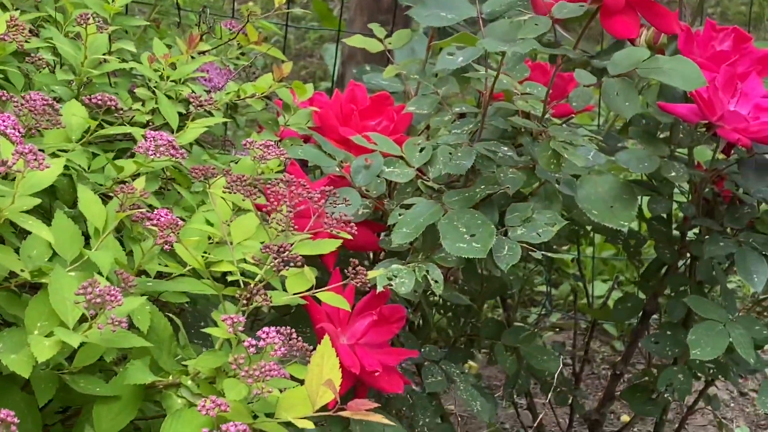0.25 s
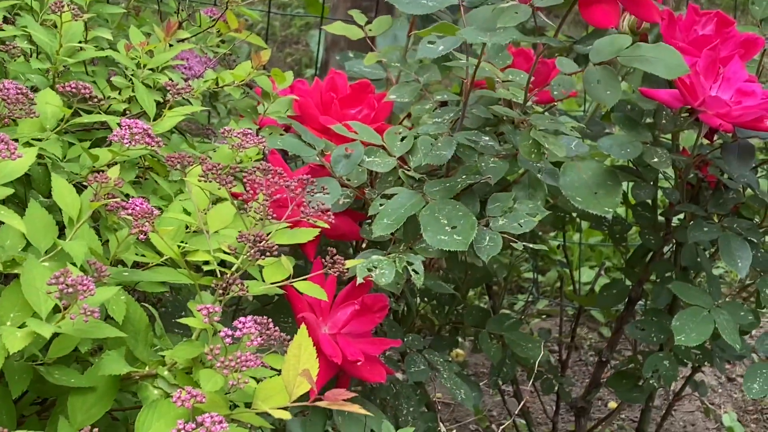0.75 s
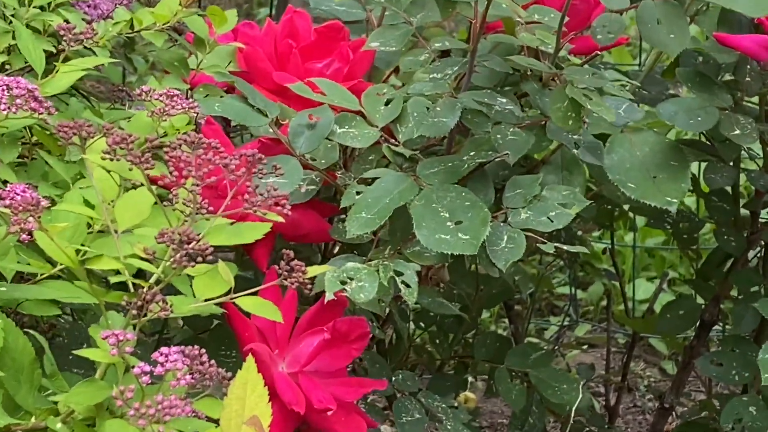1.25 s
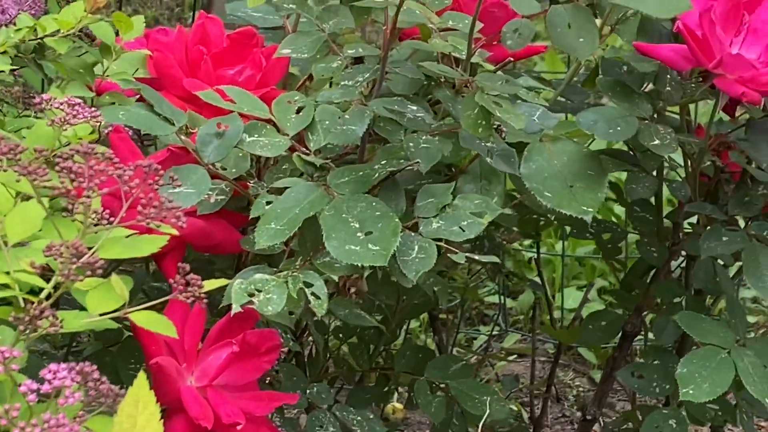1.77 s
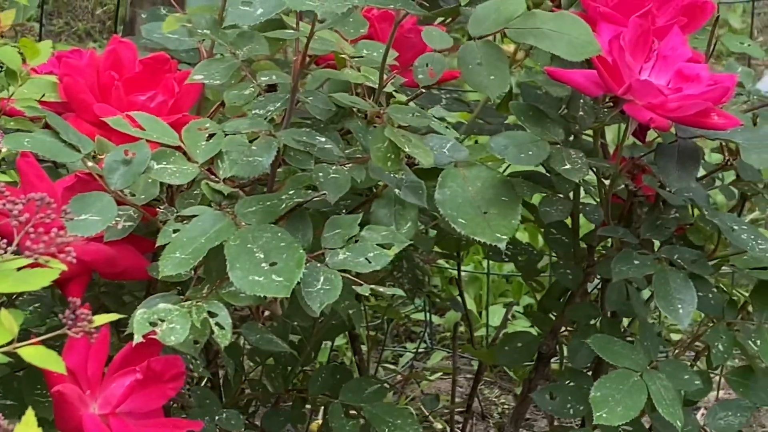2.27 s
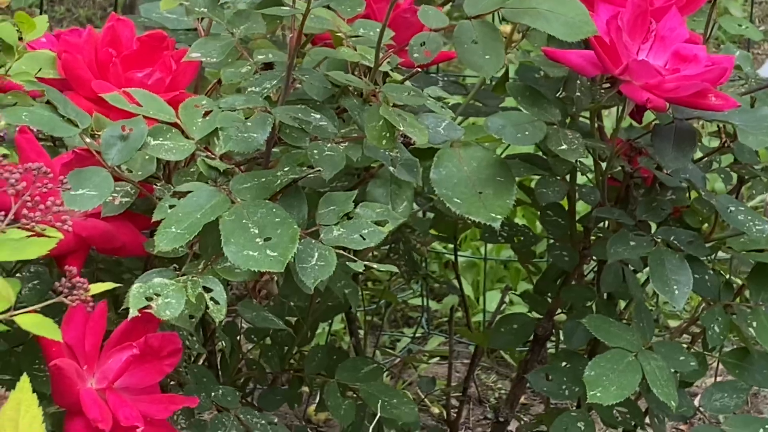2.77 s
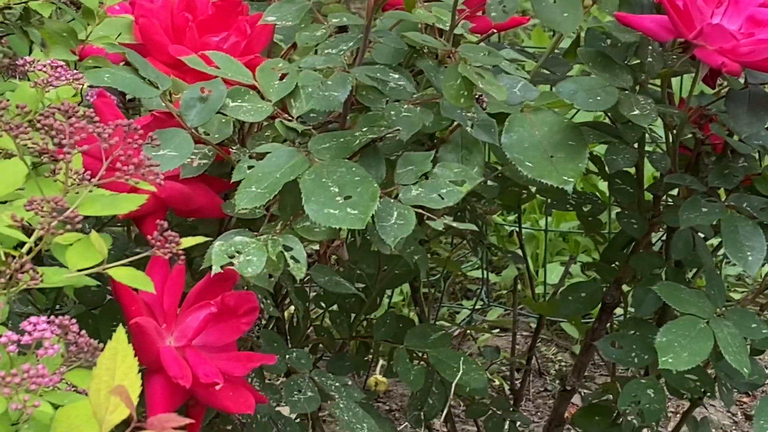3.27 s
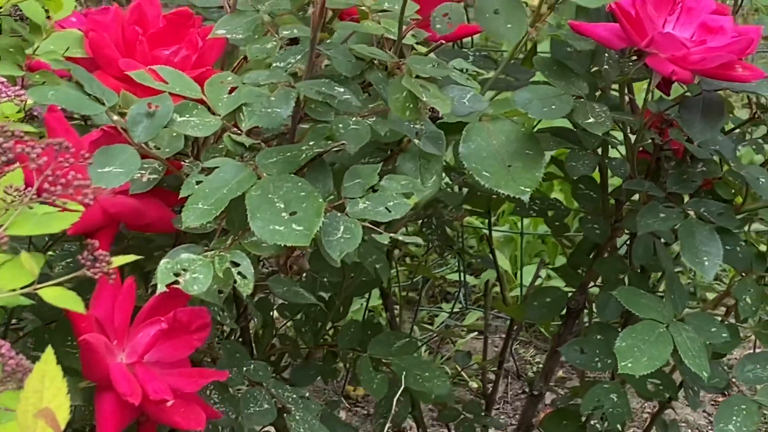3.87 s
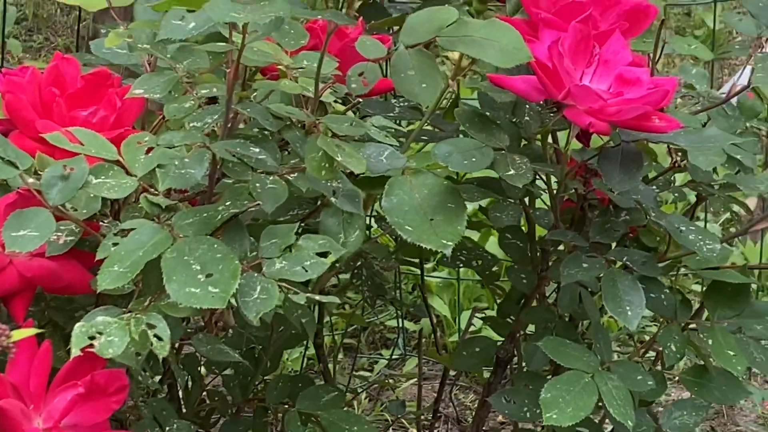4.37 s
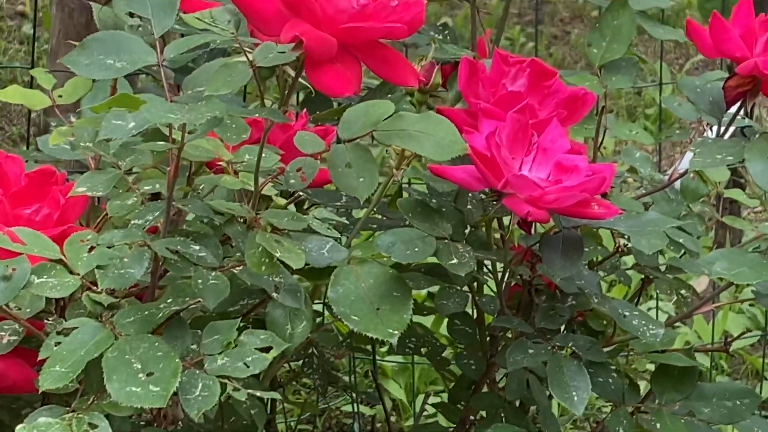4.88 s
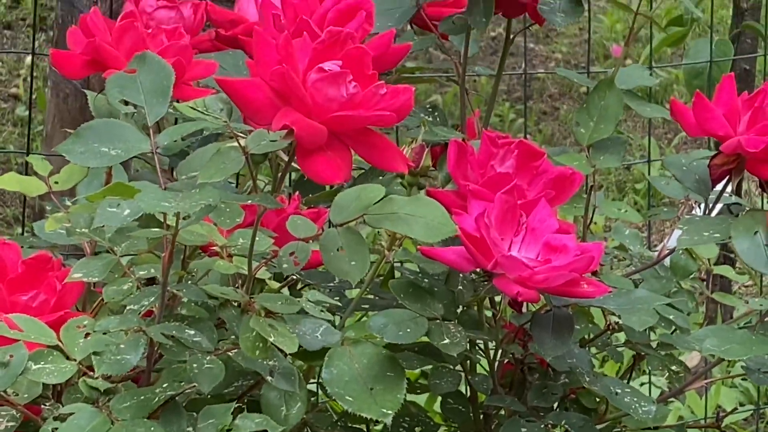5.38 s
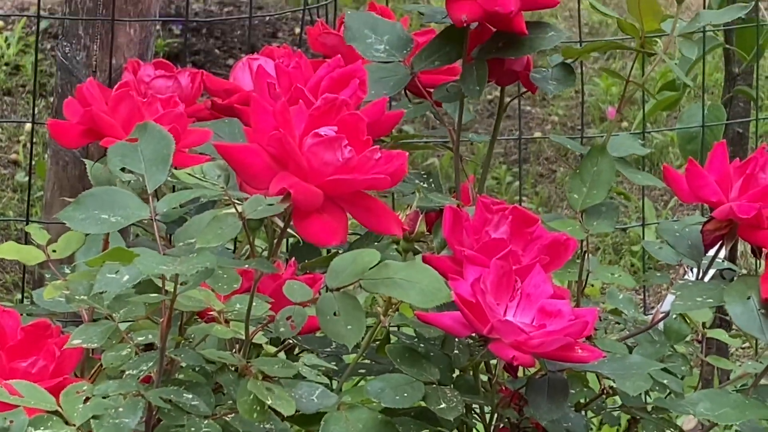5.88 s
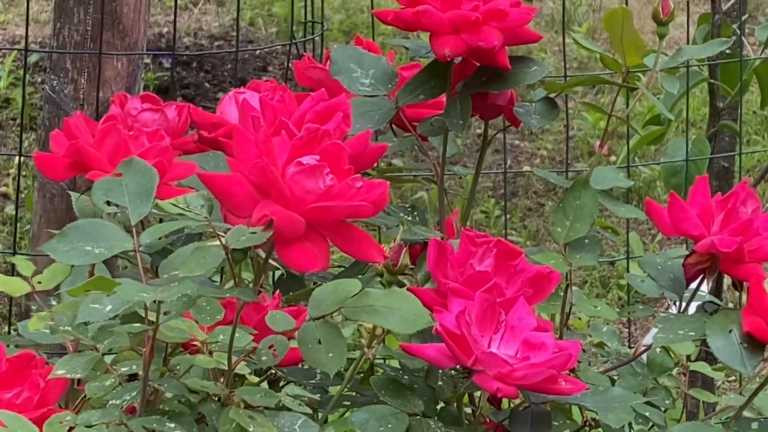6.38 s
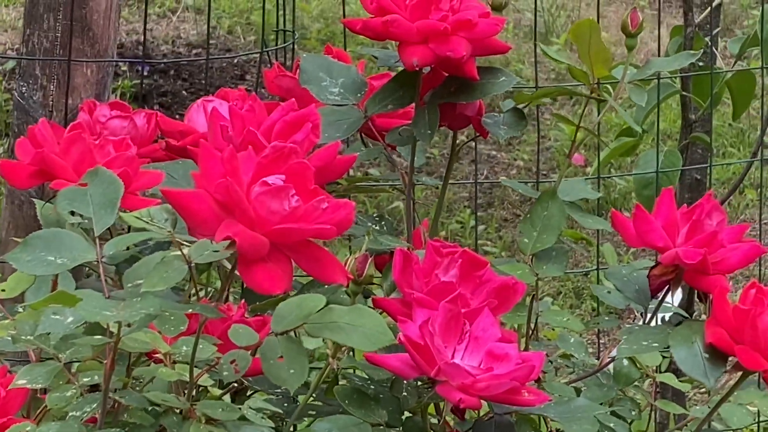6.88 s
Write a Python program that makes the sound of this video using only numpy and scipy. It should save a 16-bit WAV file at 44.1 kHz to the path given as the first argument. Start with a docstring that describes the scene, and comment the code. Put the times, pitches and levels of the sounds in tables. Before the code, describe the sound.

The sound opens on quiet garden air and a faint, distant hum. From about 0.5 seconds, a vehicle some way off gives a few soft, dull thumps, a relay ticks and a fuel pump whines faintly. At 1.25 seconds the starter clacks in and grinds through five quick strokes. The V8 engine catches at about 2 seconds, with a metallic clank as the starter lets go. The engine surges, loudest and highest around 2.6 seconds, then sinks back by 4 seconds, with a few small clicks on the way. From there until the end at about 7 seconds it holds a lumpy idle: a low, throbbing exhaust rumble, a droning fan, light valve clatter and occasional brief rattles. A bird chirps very faintly a few times between 4.3 and 5.7 seconds. Walls and fences add slight, short reflections.

```python
"""Garden air and a far hum; then soft thumps, a fuel pump and a relay, as a V8 is started some way off.
The starter clacks in and grinds through five compression strokes, the engine catches and the pinion
drops out with a clank. The engine flares, then settles to a lumpy idle: unequal exhaust puffs throb,
a belt-driven fan drones, valve gear clatters and small parts rattle. A bird chirps faintly.
Walls and fences scatter the sound."""
import sys
import numpy as np
from scipy import signal
from scipy.fft import rfft, irfft, next_fast_len
from scipy.io import wavfile

SR = 44100
rng = np.random.default_rng(int(sys.argv[2]) if len(sys.argv) > 2 else 0)


def wrap_up_sound(samples):
    """Save the sound to the file named by the first command line argument, as 16-bit audio."""
    columns = np.atleast_2d(samples).T
    # keep every value between -1 and 1, then stretch to whole-number steps
    tamed = np.clip(columns, -1, 1)
    steps = np.round(tamed * 32767).astype(np.int16)
    wavfile.write(sys.argv[1], SR, steps)


N = 314874
TIME = np.arange(N) / SR


def from_db(db):
    """Decibels to gain."""
    return 10 ** (np.asarray(db) / 20)


def power_sum_db(*levels_db):
    """Level of several contributions, powers added."""
    return 10 * np.log10(sum(from_db(level_db) ** 2 for level_db in levels_db))


def unit_rms(x):
    """Scale to unit power."""
    return x / np.sqrt(np.mean(x ** 2) + 1e-20)


def curves(rows):
    """One piecewise-linear curve per column after time_s."""
    time_s, *columns = np.transpose(rows)
    return [np.interp(TIME, time_s, column) for column in columns]


def gate(start_s, fade_s):
    """Fade in and stay open."""
    return np.clip((TIME - start_s) / fade_s, 0, 1)


def push(start_s, length_s, attack_s, release_s):
    """Envelope: linear attack, hold, exponential release."""
    return gate(start_s, attack_s) * np.exp(-np.maximum(TIME - start_s - length_s, 0) / release_s)


def blow(start_s, t60_s, rise_s):
    """Envelope: quick rise, exponential decay."""
    age_s = np.maximum(TIME - start_s, 0)
    return (1 - np.exp(-age_s / rise_s)) * 1000. ** (-age_s / t60_s)


def noise():
    """White noise."""
    return rng.standard_normal(N)


def drift(rate_hz):
    """Slow random wander of unit rms."""
    hop, warm_up = 40, 2000
    pole = np.exp(-2 * np.pi * hop * rate_hz / SR)
    steps = rng.standard_normal(N // hop + warm_up + 2)
    slow = signal.lfilter([1], [1, -2 * pole, pole * pole], steps)[warm_up:]
    return np.interp(np.arange(N) / hop, np.arange(len(slow)), unit_rms(slow))


def turns(hz):
    """Cycles done so far."""
    return np.cumsum(hz * np.ones(N)) / SR


def sine(cycles, level_db=0):
    """Tone at an rms level."""
    return np.sqrt(2) * from_db(level_db) * np.sin(2 * np.pi * cycles)


def clicks(cycles):
    """One click as each cycle begins."""
    return np.diff(np.floor(cycles), prepend=0)


def coloured(x, points):
    """Filter by (freq_hz, gain_db) points; 24 dB per octave roll-off beyond the ends."""
    freq_hz, gain_db = np.transpose(points)
    size = next_fast_len(N + SR // 4)
    octave, known = np.log2(np.arange(size // 2 + 1) * SR / size + 1), np.log2(freq_hz + 1)
    outside = np.abs(octave - np.clip(octave, known[0], known[-1]))
    gain = from_db(np.interp(octave, known, gain_db) - 24 * outside)
    return irfft(rfft(x, size) * gain, size)[:N]


def resonance(x, hz, width_hz, unit_peak=True):
    """One two-pole mode."""
    radius = np.exp(-np.pi * width_hz / SR)
    gain = (1 - radius ** 2) / 2 if unit_peak else 1
    feedback = [1, -2 * radius * np.cos(2 * np.pi * hz / SR), radius ** 2]
    return signal.lfilter([gain, 0, -gain], feedback, x)


def echoes(x, t60_s):
    """Dense, dying reflections at unit energy gain."""
    age_s = TIME[:SR // 3]
    cloud = rng.standard_normal(len(age_s)) * 1000. ** (-age_s / t60_s)
    return signal.fftconvolve(x, cloud / np.linalg.norm(cloud))[:N]


def knocks(rows, sharp, body, rise_s, body_gain=1):
    """Each knock has a sharp part and its own share of a lower body."""
    sharp, body = unit_rms(sharp), body_gain * unit_rms(body)
    return sum(from_db(level_db) * blow(start_s, t60_s, rise_s) * (sharp + from_db(body_db) * body)
               for start_s, level_db, t60_s, body_db in rows)


# Air spectrum: freq_hz, gain_db
AIR_COLOUR = [(25, -22), (36, -5), (47, 4.5), (66, 0), (125, 0), (150, -5.5), (176, -7.5), (207, -8),
              (243, -14), (354, -15.5), (404, -21.5), (903, -24.5), (1030, -25), (1420, -23.5),
              (3440, -35.5), (4750, -37), (15000, -72)]

def garden_air(level_db=-49):
    """Steady, low outdoor rush."""
    return from_db(level_db) * unit_rms(coloured(noise(), AIR_COLOUR))


# Hum tones: harmonic, level_db, swell_share
HUM_TONES = [(3, -52.5, .1), (4, -51, 1), (5, -60, .3), (6, -59, 0)]
# Hum swell: time_s, gain_db
HUM_SWELL = [(0, 8), (0.12, 8.5), (0.2, 4), (0.5, 2), (0.7, -1), (1.4, -2), (1.6, 2)]

def far_hum(base_hz=25.8):
    """Distant harmonics, wavering in pitch and level."""
    swell_db, = curves(HUM_SWELL)
    cycles = turns(base_hz * (1 + 0.0124 * drift(5)))
    return sum(sine(harmonic * cycles + rng.random(), level_db + share * swell_db + 1.5 * drift(5.6))
               for harmonic, level_db, share in HUM_TONES)


# Body bumps: start_s, level_db, t60_s
THUMPS = [(0.49, -34.5, 0.24), (0.525, -31.5, 0.17), (0.68, -38, 0.11), (1.15, -39, 0.12), (1.3, -38, 0.36),
          (1.68, -35, 0.28)]
# Bump spectrum: freq_hz, gain_db
THUMP_COLOUR = [(35, -17), (80, 7.5), (130, -12), (350, -16.5), (600, -37), (1500, -55)]

def soft_thumps():
    """Dull bumps from the vehicle's body."""
    envelope = sum(from_db(level_db) * blow(start_s, t60_s, rise_s=0.0075)
                   for start_s, level_db, t60_s in THUMPS)
    return envelope * unit_rms(coloured(noise(), THUMP_COLOUR))


# Pump run: time_s, pitch_hz, level_db
PUMP_RUN = [(0.55, 335, -90), (0.62, 357.5, -61.5), (0.85, 357.5, -61.5), (1.05, 349.6, -66.5),
            (1.24, 338, -65), (1.3, 334.5, -83)]

def fuel_pump():
    """The pump primes: a sagging whine over a lower motor note."""
    pitch_hz, level_db = curves(PUMP_RUN)
    motor = sine(turns(pitch_hz * 7 / 12), level_db + 2 + 2 * drift(5.9))
    return sine(turns(pitch_hz), level_db) + motor


# Small ticks: start_s, level_db, t60_s, body_db
TICKS = [(0.585, -53.5, 0.13, -19), (0.61, -60, 0.23, -15), (2.768, -37, 0.04, 0), (2.933, -42, .05, -8),
         (3.295, -46.5, 0.16, -1), (3.325, -43, 0.079, 2), (4.601, -49, 0.043, -6), (7.018, -48, 0.23, 12)]
# Tick spectrum: freq_hz, gain_db
TICK_COLOUR = [(300, -13), (1000, 17.5), (4000, 8), (7000, 6), (10000, -1.5), (14000, -1), (15400, -4)]

def ticks():
    """A relay and a few loose parts click over a hollow body."""
    body = coloured(noise(), [(250, -5), (400, -2), (700, -3), (1000, -6), (1600, -14)])
    return knocks(TICKS, coloured(noise(), TICK_COLOUR), body, rise_s=0.005)


# Bird calls: start_s, length_s, start_hz, end_hz, level_db
CHIRPS = [(0.75, 0.11, 5200, 4800, -76), (4.347, 0.07, 6500, 7330, -63.5), (4.43, .06, 7300, 6940, -67),
          (5.075, 0.06, 6500, 7350, -62), (5.64, 0.05, 6450, 7400, -62)]

def bird(hoarseness=0.1):
    """Thin glides, made hoarse by fast pitch jitter."""
    out, waver = np.zeros(N), 1 + hoarseness * drift(400)
    for start_s, length_s, start_hz, end_hz, level_db in CHIRPS:
        along = np.clip((TIME - start_s) / length_s, 0, 1)
        pitch_hz = (start_hz + along * (end_hz - start_hz)) * waver
        out += np.sin(np.pi * along) * sine(turns(pitch_hz), level_db)
    return out


# Block and bell housing modes: freq_hz, width_hz, gain_db
HOUSING_MODES = [(706, 15, -3), (996, 75, 3), (1150, 8.8, 9.5), (1357, 23, 2.5), (1640, 11, 7),
                 (1690, 22, 6), (1790, 17, 12.5), (1910, 18, 6.5), (2435, 13, -2), (3700, 18, -1.5),
                 (4380, 90, 2), (5520, 110, 5), (5670, 31, -2)]

def housing(x, ring_db):
    """The castings ring on top of the direct sound."""
    return x + sum(from_db(gain_db + ring_db) * resonance(x, hz, width_hz)
                   for hz, width_hz, gain_db in HOUSING_MODES)


# Starter blows: start_s, level_db, t60_s, body_db
CLACKS = [(1.246, -42, .2, -23), (1.256, -24, 0.18, -16), (1.274, -30.5, 0.12, -10),
          (1.598, -32, 0.087, 6.5), (1.692, -34, 0.1, 5.5), (1.771, -27.5, 0.09, -1),
          (1.986, -30.5, 0.11, -15)]
# Blow spectrum: freq_hz, gain_db
CLACK_COLOUR = [(300, -32), (600, -51), (1000, -8.5), (1600, -7.5), (2430, -14), (3720, -11), (7500, -17.5),
                (11000, -30), (14000, -31), (15400, -30)]
# Starter mount modes: freq_hz, gain_db, t60_s
MOUNT_MODES = [(312, -6, .13), (385, -11, .1), (705, -12, .12), (1000, -8, .14), (1150, -11, .2)]

def pinion_clacks():
    """The pinion slides out, slams in, takes up backlash and drops out; each blow thuds in the mount."""
    metal = coloured(housing(noise(), ring_db=-5.5), CLACK_COLOUR)
    body = coloured(noise(), [(230, -12), (330, 3), (450, -10), (700, -7.5), (1100, -12)])
    thuds = sum(blow(start_s, t60_s, rise_s=0.0056)
                * sine(hz * TIME + rng.random(), level_db + body_db + gain_db)
                for start_s, level_db, _, body_db in CLACKS for hz, gain_db, t60_s in MOUNT_MODES)
    return knocks(CLACKS, metal, body, rise_s=0.0035, body_gain=0.6) + thuds


ENGAGE_S, DROP_OUT_S = 1.258, 2.012
# Compressions: start_s, length_s, mesh_hz, sag_per_s, whine_db, grind_db, housing_db
STROKES = [(1.338, 0.07, 242, .6, -38, -54, -45), (1.462, 0.07, 287, 1.9, -39, -49, -40.5),
           (1.595, 0.024, 316.4, .6, -40, -49, -42), (1.685, 0.036, 346, .6, -43, -42, -41),
           (1.768, 0.03, 385, .6, -45, -37, -39)]

def cranking(rasp_share=0.18):
    """Mesh pitch and gains of whine, grind and rasp: each compression loads and slows the starter."""
    mesh_hz, whine = np.full(N, STROKES[0][2], float), 0
    grind = from_db(np.interp(TIME, [ENGAGE_S, DROP_OUT_S], [-36, -50]))
    rasp = from_db(np.interp(TIME, [ENGAGE_S, DROP_OUT_S], [-50.5, -37.5]))
    for start_s, length_s, hz, sag_per_s, whine_db, grind_db, _ in STROKES:
        load = push(start_s, length_s, attack_s=0.014, release_s=0.02)
        mesh_hz = np.where(TIME < start_s, mesh_hz, hz * np.exp(-sag_per_s * (TIME - start_s)))
        whine += from_db(whine_db) * load
        grind += from_db(grind_db) * load
        rasp += rasp_share * from_db(grind_db) * load
    return mesh_hz, whine, grind, rasp


def housing_note(pitch_hz=1705, waver=0.015):
    """The bell housing's rough note swells under every compression."""
    swell = sum(from_db(level_db) * push(start_s, length_s, attack_s=0.028, release_s=0.034)
                for start_s, length_s, *_, level_db in STROKES)
    return swell * sine(turns(pitch_hz * (1 + waver * drift(150))))


def dispersed(x, length_s=0.008):
    """Bending waves carry a contact's treble ahead of its bass."""
    sweep = signal.chirp(TIME[:int(length_s * SR)], 9000, length_s, 0)
    return signal.fftconvolve(x, sweep)[:N]


# Gear spectra: freq_hz, gain_db
WHINE_COLOUR = [(150, -22), (240, 6.5), (320, 13.5), (470, 13), (580, -5), (700, 8), (920, -3.5),
                (1200, -11), (1450, 4), (1800, -2), (2200, 2), (4000, -12), (7000, -44)]
GRIND_COLOUR = [(130, -44), (220, -0.5), (306, 1.5), (582, -8.5), (712, 0.5), (818, -11), (976, -3),
                (1720, -3.5), (2580, -8.5), (4500, -15.5), (5850, -40), (9900, -120)]
RASP_COLOUR = [(1500, 0.5), (2500, -0.5), (3900, -6.5), (5900, -1), (7400, -4), (8600, -13), (10500, -11),
               (14000, -23), (15300, -12)]

def starter(mesh_depth=0.14, chatter_db=2):
    """Pinion teeth grind on the flywheel; the casing smears their contacts into a whine."""
    mesh_hz, whine_gain, grind_gain, rasp_gain = cranking()
    teeth = turns(mesh_hz * (1 + 0.008 * drift(60)))
    contacts = housing(clicks(teeth), ring_db=-1)
    rub = 1 + mesh_depth * np.cos(2 * np.pi * teeth)
    whine = whine_gain * unit_rms(coloured(dispersed(contacts), WHINE_COLOUR))
    grind = grind_gain * unit_rms(coloured(housing(noise() * rub, ring_db=1), GRIND_COLOUR))
    rasp_gain *= from_db(chatter_db * drift(25))
    rasp = rasp_gain * unit_rms(coloured(housing(noise() * rub, ring_db=-19), RASP_COLOUR))
    engaged = push(ENGAGE_S, DROP_OUT_S - ENGAGE_S, attack_s=0.019, release_s=0.02)
    return (whine + grind + rasp + housing_note()) * engaged


# Engine speeds from sag to flare: firing_hz
SPEEDS_HZ = [56, 63, 80, 98]

def at_speed(levels_db, firing_hz):
    """A layer's level at the engine's speed."""
    return np.interp(firing_hz, SPEEDS_HZ, levels_db)


def shaft_tones(cycles, rows, firing_hz, shift_db=0, waver_db=1.5):
    """Harmonics of a rotation; speed sets each level."""
    return sum(sine(harmonic * cycles + rng.random(),
                    at_speed(levels_db, firing_hz) + shift_db + waver_db * drift(1.75))
               for harmonic, *levels_db in rows)


# First firings: start_s, length_s, note_db, rumble_db
CATCHES = [(1.881, 0.04, -29, -41), (1.97, .13, -24.5, -39), (2.105, .04, -22, -36)]

def catching():
    """Levels of exhaust note and rumble as the first, rich firings boom."""
    note, rumble = 1e-9, 1e-9
    for start_s, length_s, note_db, rumble_db in CATCHES:
        boom = push(start_s, length_s, attack_s=0.015, release_s=0.037)
        note += from_db(note_db) * boom
        rumble += from_db(rumble_db) * boom
    return 20 * np.log10(note), 20 * np.log10(rumble)


# Puff strengths in firing order: gain_db
CYLINDERS_DB = [-7, -7, -6.5, -11, -5, -11, -6, -6]

def cylinder_puffs(firings, uneven_db=0.4, decay_firings=0.91):
    """Each cylinder lets go a puff of gas and a thump; unequal puffs make the idle lumpy."""
    number = np.floor(firings).astype(int)
    strength = from_db(np.array(CYLINDERS_DB)[number % len(CYLINDERS_DB)] + uneven_db * noise()[number])
    puffs = unit_rms(strength * np.exp(-(firings % 1) / decay_firings))
    thumps = unit_rms(clicks(firings) * noise()[number])
    return puffs, thumps


def gas_flow(cycles, puffs, colour, repeat_share=0.4, size=512):
    """Part of the flow repeats every engine cycle as gliding overtones; the rest is turbulence."""
    pattern = np.interp(cycles * size, np.arange(size), rng.standard_normal(size), period=size)
    repeating = unit_rms(coloured(pattern, colour))
    turbulent = unit_rms(coloured(np.sqrt(puffs) * noise(), colour))
    return np.sqrt(repeat_share) * repeating + np.sqrt(1 - repeat_share) * turbulent


# Exhaust push beyond what speed gives: time_s, gain_db
EFFORT = [(1.9, -3.5), (2.3, 2), (2.6, 0.5), (2.95, 0.5), (3.9, -0.5), (4.4, -0.5), (4.95, 1.5),
          (5.7, -0.5), (6.5, -1.5), (7.14, 0)]
# Tailpipe resonance: firing_hz, note_db
TAILPIPE = [(56, -42.5), (63, -35.5), (75, -30.5), (81, -34), (85, -42), (98, -39)]
# Exhaust at each of SPEEDS_HZ, before trim: level_db
RUMBLE_DB = [-37.5, -35, -29, -25]
BARK_DB = [-43, -41, -35.5, -31.5]
# Exhaust spectra: freq_hz, gain_db
RUMBLE_COLOUR = [(25, -24), (38, -11), (58, -2), (78, 1), (100, 2.5), (125, -3), (165, -1), (230, -27),
                 (400, -52)]
BARK_COLOUR = [(110, -25), (175, 0.5), (208, 1.5), (232, 0), (268, -2), (296, 4), (318, -1.5), (355, 0),
               (425, -11), (520, -12.5), (800, -27.5), (1500, -20)]
ROAR_COLOUR = [(300, -5), (400, 7), (520, -3), (640, -3), (900, -29), (1500, -32)]
# Unevenly firing banks: cycle_harmonic, level_db at each of SPEEDS_HZ
BANK_TONES = [(3, -70, -66, -53, -49), (5, -51, -48, -47, -35.5), (6, -66, -62, -42, -39),
              (9, -48, -44, -52, -40), (11, -53, -48.5, -51, -50), (16, -44, -46.5, -46, -50),
              (18, -58, -60, -49, -54), (24, -55, -52, -55, -50)]

def exhaust(firings, firing_hz, build_db, rumble_trim_db=-3.5, bark_trim_db=0.15, roar_db=-9):
    """Puffs in the tailpipe make a firing note, rumble and bark; fast ones roar."""
    effort_db, = curves(EFFORT)
    catch_note_db, catch_rumble_db = catching()
    note_db = power_sum_db(np.interp(firing_hz, *np.transpose(TAILPIPE)) + effort_db, catch_note_db)
    running_db = at_speed(RUMBLE_DB, firing_hz) + effort_db + 0.6 * build_db
    rumble_db = power_sum_db(running_db, catch_rumble_db) + rumble_trim_db
    bark_db = at_speed(BARK_DB, firing_hz) + effort_db + build_db + bark_trim_db
    cycles = firings / len(CYLINDERS_DB)
    puffs, thumps = cylinder_puffs(firings)
    rumble = unit_rms(coloured(puffs * noise() + 0.48 * thumps, RUMBLE_COLOUR))
    bark = gas_flow(cycles, puffs, BARK_COLOUR)
    flare = np.interp(firing_hz, [64, 96], [0, 1])
    roar = flare * from_db(roar_db) * gas_flow(cycles, puffs, ROAR_COLOUR)
    tones = sine(firings, note_db + 1.3 * drift(9)) + shaft_tones(cycles, BANK_TONES, firing_hz)
    return tones + from_db(rumble_db) * rumble + from_db(bark_db) * (bark + roar)


# Fan drone: shaft_harmonic, level_db at each of SPEEDS_HZ
FAN_TONES = [(3, -51, -45.5, -37, -43), (5, -58, -56, -43, -43), (6, -56, -49.5, -48, -39.5),
             (7, -40.5, -37.5, -41, -32.5)]
# Hub note at each of SPEEDS_HZ: level_db
HUB_DB = [-52, -44, -42, -33]

def fan(firing_hz, build_db, blades=7, passes_per_firing=2.083, grip_s=2.31, pull_db=-32.5):
    """Unevenly spaced blades drone; the hub note swells as the slipping belt drags the fan to speed."""
    slip = np.interp(TIME, [grip_s - 0.16, grip_s], [0.16, 0])
    shaft = turns(firing_hz * (1 - slip) * passes_per_firing / blades)
    pull = from_db(pull_db) * push(start_s=2.17, length_s=0.46, attack_s=0.044, release_s=0.084)
    hub = (from_db(at_speed(HUB_DB, firing_hz)) + pull) * sine(4 * shaft + rng.random())
    return hub + shaft_tones(shaft, FAN_TONES, firing_hz, build_db)


# Clatter spectrum: freq_hz, gain_db
CLATTER_COLOUR = [(260, -8), (450, -2.5), (640, -4.5), (850, -4), (1020, -3), (1250, -6.5), (1450, -3),
                  (1870, -5), (2150, -10.5), (2900, -15.5), (4300, -20.5), (5500, -25.5), (7200, -23),
                  (10000, -43.5), (15000, -34)]
# Clatter at each of SPEEDS_HZ, before trim: level_db
CLATTER_DB = [-50, -50, -43.5, -39.5]
# Block and valve cover modes: freq_hz, width_hz, gain_db
BLOCK_MODES = [(549, 25, -3), (1157, 25, -8), (1385, 45, -4), (1619, 25, -10), (1781, 30, -1),
               (1912, 25, -7)]
COVER_MODES = [(2455, 60, -8), (2850, 200, -7), (3200, 90, -13), (3600, 300, -14), (3885, 80, -7),
               (4220, 200, -19)]

def clatter(firings, firing_hz, beat_depth=0.034, grain_db=0.27, trim_db=2.5):
    """Valve gear and rushing air swell slightly at each firing and ring the block and covers."""
    swell = (1 + beat_depth * np.cos(2 * np.pi * firings)) * from_db(grain_db * drift(180))
    rush = noise() * swell
    rings = sum(from_db(gain_db) * resonance(rush, hz, width_hz)
                for hz, width_hz, gain_db in BLOCK_MODES + COVER_MODES)
    level_db = at_speed(CLATTER_DB, firing_hz) + trim_db
    return from_db(level_db) * unit_rms(coloured(rush + rings, CLATTER_COLOUR))


# Intake spectrum: freq_hz, gain_db
HISS_COLOUR = [(5000, 8), (7000, -5), (10000, 3.5), (12200, -7.5), (14000, 4), (15500, -10)]
# Intake at each of SPEEDS_HZ: level_db
HISS_DB = [-70.5, -67, -66.5, -65]

def intake(firing_hz, fires_s, gulp_db=-57.5, flutter_db=1.5):
    """Hissing air gulps in as the engine catches, then follows its speed."""
    gulp = from_db(gulp_db) * push(fires_s, length_s=0.41, attack_s=0.096, release_s=0.49)
    flow = from_db(at_speed(HISS_DB, firing_hz)) * gate(fires_s, 0.1)
    return (gulp + flow) * from_db(flutter_db * drift(22)) * unit_rms(coloured(noise(), HISS_COLOUR))


# Catch, flare, sag and idle: time_s, firing_hz
ENGINE_SPEED = [(1.85, 62), (1.94, 71), (1.985, 55), (2.04, 64), (2.09, 69.5), (2.15, 80), (2.3, 84),
                (2.5, 94), (2.62, 98.3), (2.75, 96.5), (3.05, 83.3), (3.35, 74.5), (3.65, 63.7),
                (4.1, 56.4), (4.5, 58.8), (5.0, 63.2), (5.9, 63.4), (7.14, 59.2)]

def engine(fires_s=1.96, build_s=0.44, weak_db=-8.5):
    """Crank speed sets pitch and loudness; rumble, bark and fan drone start weak and build."""
    firing_hz, = curves(ENGINE_SPEED)
    firing_hz *= 1 + 0.003 * drift(8)
    firings = turns(firing_hz)
    build_db = np.interp(TIME, [fires_s, fires_s + build_s], [weak_db, 0])
    low = exhaust(firings, firing_hz, build_db) + fan(firing_hz, build_db)
    high = clatter(firings, firing_hz) * gate(1.905, 0.077) + intake(firing_hz, fires_s)
    return low * gate(1.85, 0.063) + high


# Pinion modes: freq_hz, width_hz, gain_db
PINION_MODES = [(1010, 70, 2.5), (1150, 59, -1), (1320, 80, -6), (1610, 68, -0.5), (2340, 65, -8),
                (2630, 50, -10)]

def pinion_clank(start_s=1.993, level_db=-29.5):
    """The pinion snaps back against its stop and rings."""
    ring = sum(from_db(gain_db) * unit_rms(resonance(noise(), hz, width_hz))
               for hz, width_hz, gain_db in PINION_MODES)
    return from_db(level_db) * blow(start_s, t60_s=0.14, rise_s=0.0046) * unit_rms(ring)


def tappets(taps_per_s=30, level_db=-68.5, spread_db=2):
    """Light, random ticks ring the valve covers."""
    taps = (rng.random(N) < taps_per_s / SR) * gate(2.2, 0.1)
    ring = np.zeros(N)
    for hz, width_hz, gain_db in COVER_MODES:
        strikes = taps * from_db(gain_db + spread_db * noise())
        ring += np.sqrt(width_hz) * resonance(strikes + 1e-18, hz, width_hz, unit_peak=False)
    return from_db(level_db) * unit_rms(echoes(ring, t60_s=0.08))


# Idle rattles: start_s, pitch_hz, level_db
RATTLES = [(3.648, 2300, -49), (3.70, 2400, -48), (3.785, 2760, -47), (4.21, 2850, -47), (4.602, 3250, -48),
           (4.748, 2830, -46.5), (5.49, 2390, -50), (6.53, 2840, -47)]

def rattles(width_hz=250):
    """Loose small parts buzz briefly, each at its own pitch."""
    shake = noise()
    return sum(from_db(level_db) * blow(start_s, t60_s=0.12, rise_s=0.0088)
               * unit_rms(resonance(shake, pitch_hz, width_hz))
               for start_s, pitch_hz, level_db in RATTLES)


# Stereo width: freq_hz, side_gain_db
WIDTH = [(30, -15), (60, -31), (110, -24), (200, -9), (380, -6), (700, -1.5), (1300, -2.5), (2300, -4),
         (4000, -37), (6000, -49), (8500, 5.5), (15000, -6)]
# Stereo balance: freq_hz, left_minus_right_db
BALANCE = [(20, 2.5), (70, 1.46), (170, -4), (350, -0.5), (700, -6), (1400, 0.5), (3000, 0), (20000, -1.5)]

def garden(x, wall_db=-12):
    """Walls and fences scatter mids and treble, differently to each side."""
    walls = coloured(echoes(x, t60_s=0.12), [(250, 0.5), (500, -0.5), (15000, 3.5)])
    mid = x + from_db(wall_db) * walls
    side = coloured(echoes(x, t60_s=0.1), WIDTH)
    left = coloured(mid + side, [(hz, lean_db / 2) for hz, lean_db in BALANCE])
    right = coloured(mid - side, [(hz, -lean_db / 2) for hz, lean_db in BALANCE])
    return np.array([left, right])


def scene():
    """All sources, heard across the garden; only the far bird's echoes arrive."""
    starting = starter() + pinion_clacks() + pinion_clank()
    small_parts = tappets() + rattles() + ticks() + soft_thumps()
    vehicle = engine() + starting + small_parts + fuel_pump()
    return garden(vehicle + echoes(bird(), t60_s=0.11) + far_hum() + garden_air())


def record(dry):
    """Steep low-pass."""
    cutoff_hz = 15400
    return signal.sosfilt(signal.ellip(10, 0.1, 80, cutoff_hz, fs=SR, output="sos"), dry)


dry = scene()
out = record(dry)
wrap_up_sound(out)
```